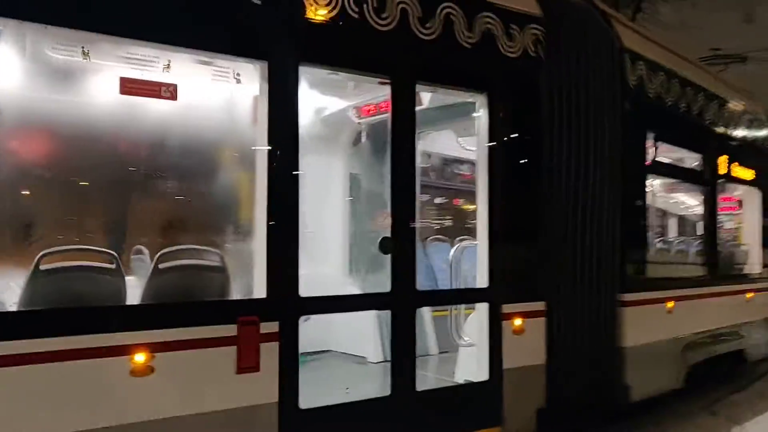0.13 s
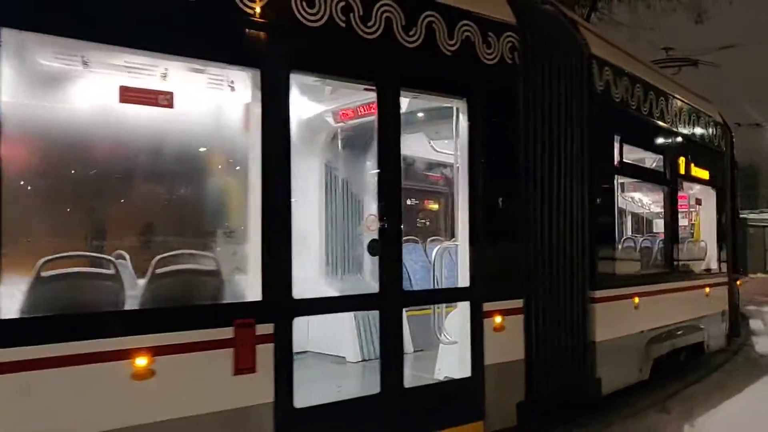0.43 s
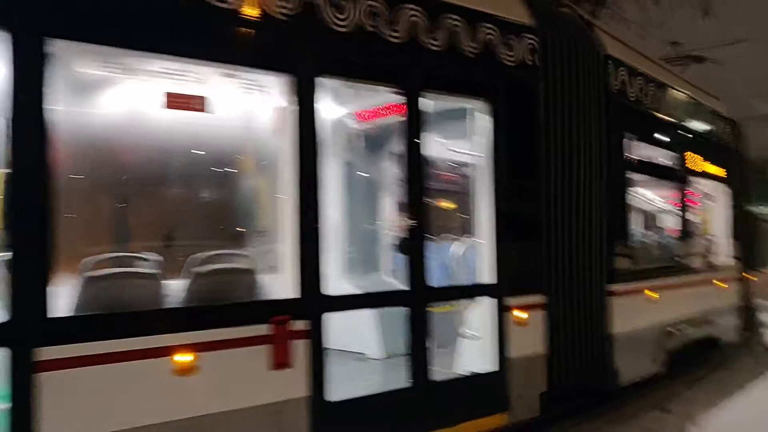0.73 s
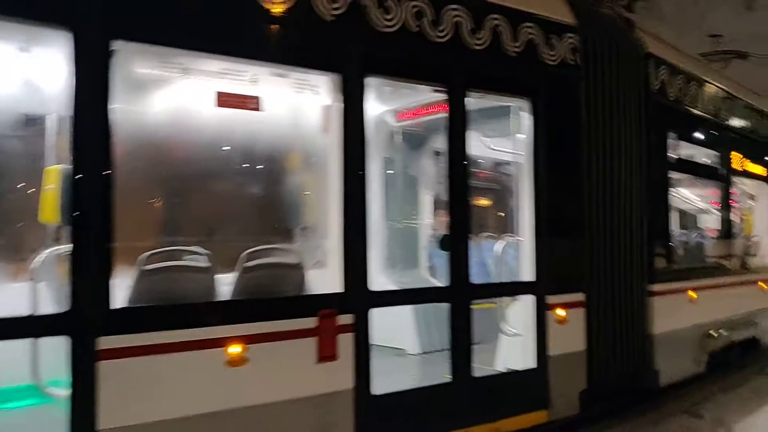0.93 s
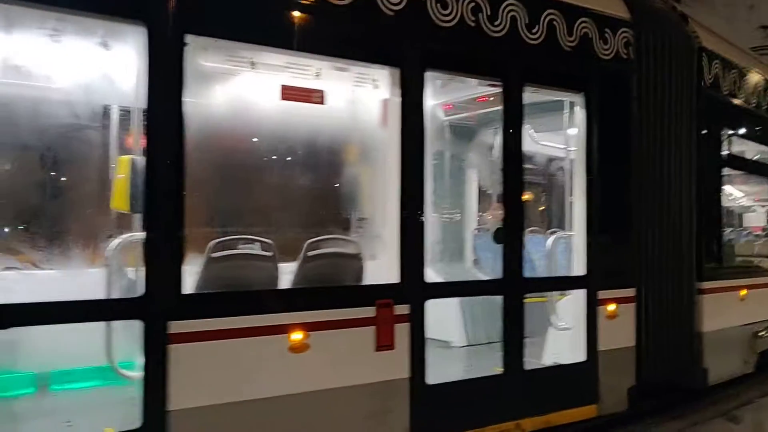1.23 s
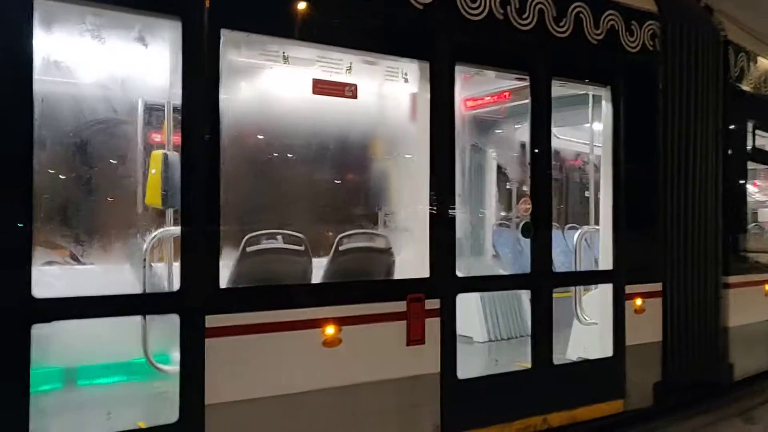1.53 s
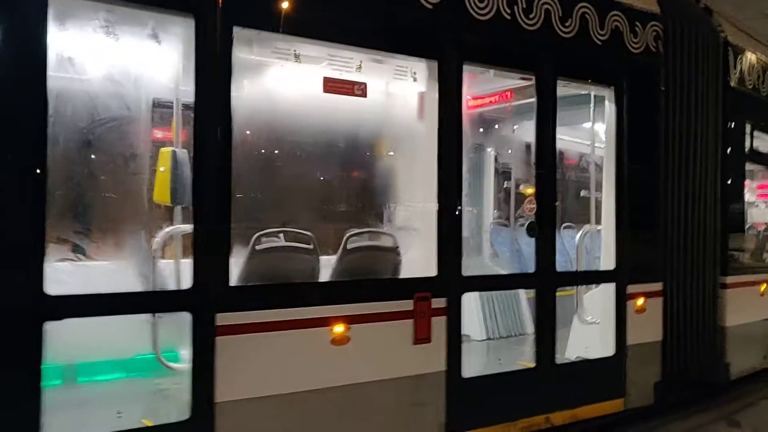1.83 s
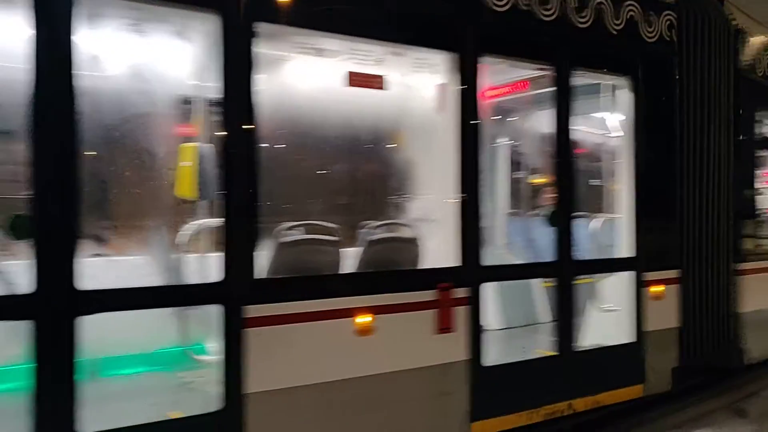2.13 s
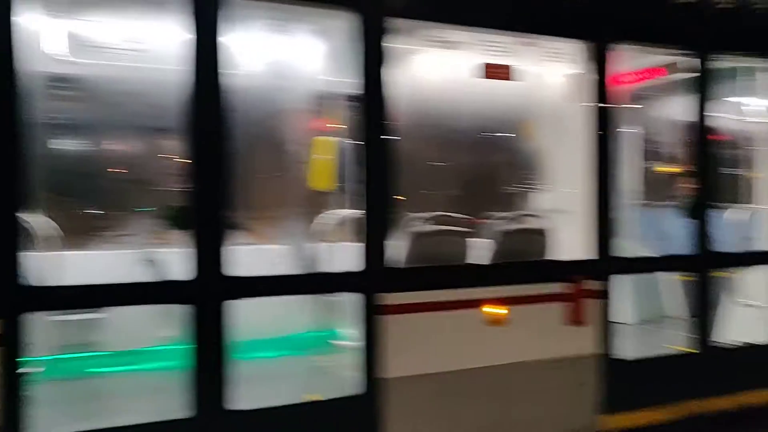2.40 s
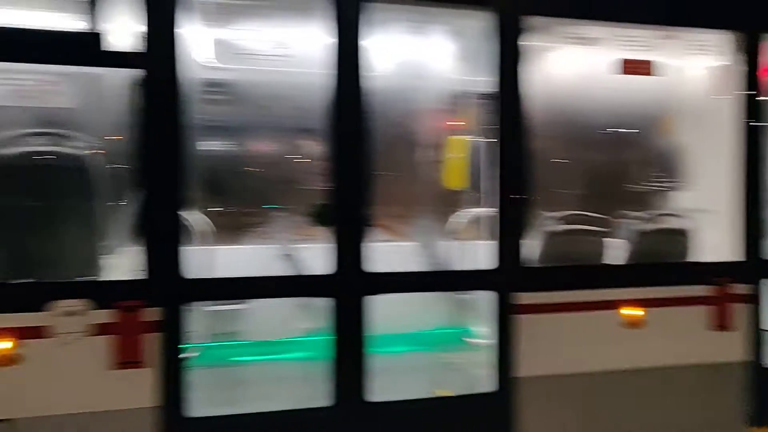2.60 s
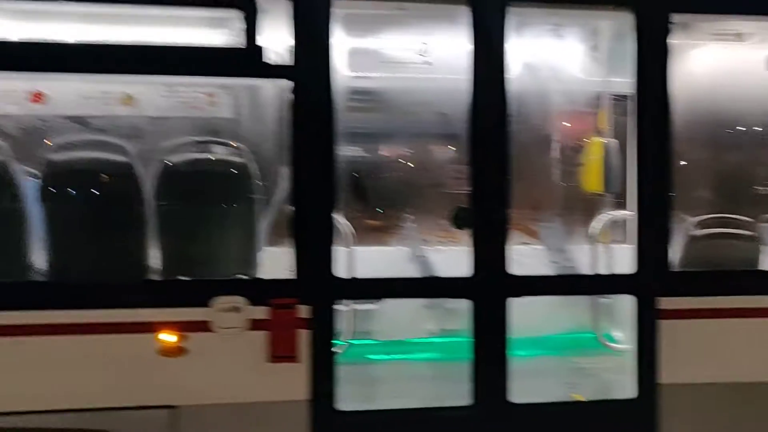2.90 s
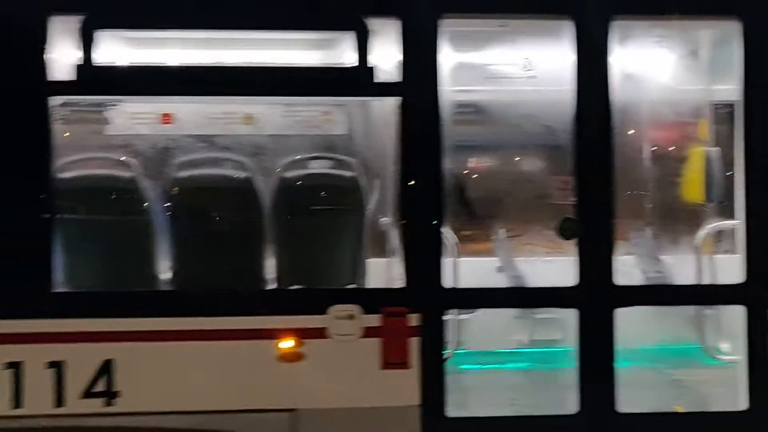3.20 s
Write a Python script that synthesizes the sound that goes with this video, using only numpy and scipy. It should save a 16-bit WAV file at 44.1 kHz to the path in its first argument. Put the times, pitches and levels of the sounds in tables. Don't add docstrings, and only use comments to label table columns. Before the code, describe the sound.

Tram rolling to a stop at night: fluttering high whine fades, deep rumble, ticks, knocks, wind gust

```python
import sys
import numpy as np
from scipy import signal
from scipy.fft import rfft, irfft, next_fast_len
from scipy.io import wavfile
from scipy.ndimage import uniform_filter1d, map_coordinates

SR = 44100
rng = np.random.default_rng(int(sys.argv[2]) if len(sys.argv) > 2 else 0)


def elevation(decibels):
    levels = np.asarray(decibels, float)
    return 10 ** (levels / 20)


def master(y):
    cut = np.clip(np.atleast_2d(y).T, -1, 1)
    pcm = np.round(cut * 32767)
    wavfile.write(sys.argv[1], SR, pcm.astype(np.int16))


N = 147735
CLOCK = np.arange(N) / SR

# t/s, electrical f/Hz, level/dB
MOTOR = [
    (0, 28, -44),
    (.3, 21.5, -45),
    (.8, 19, -47.5),
    (1.3, 12.6, -52.5),
    (1.62, 9.9, -53),
    (1.78, 9.5, -48),
    (1.93, 9.1, -57),
    (2.06, 6.8, -64),
    (2.15, 6.7, -90),
]
CARRIER_HZ = 2500.5


def unit(x):
    return x / np.sqrt(np.mean(x ** 2) + 1e-20)


def along(points, hz):
    f, value = np.transpose(points)
    return np.interp(np.log(hz + 1), np.log(f + 1), value)


def curves(rows):
    s, *cols = np.transpose(rows)
    return [np.interp(CLOCK, s, c) for c in cols]


def wobble(rate):
    knots = rng.standard_normal(int(N * 40 / SR) + 4)
    return map_coordinates(knots, [np.arange(N) * min(rate, 39) / SR])


def filtered(x, response):
    m = next_fast_len(N + SR // 2)
    return irfft(rfft(x, m) * response(np.fft.rfftfreq(m, 1 / SR)), m)[..., :N]


def resonances(body):
    def response(f):
        return sum((-1) ** k * elevation(db) * 1j * f * width / (hz * hz - f * f + 1j * f * width)
                   for k, (hz, width, db) in enumerate(body))
    return response


def swell(start_s, length_s):
    return np.sin(np.pi * np.clip((CLOCK - start_s) / length_s, 0, 1)) ** 2


def rush(gain, patchy_db):
    # f/Hz, likeness (0 to 1)
    alike = [(60, 0.67), (330, 0.98), (650, 0.12), (1400, 0.72), (2200, 0.24), (4500, 0.031), (7000, 0.026)]
    z = signal.stft(rng.standard_normal((2, N)), nperseg=512)[2]
    field = uniform_filter1d(rng.standard_normal(z.shape[1:]), size=6, axis=0)
    field = uniform_filter1d(field, size=14, axis=1)
    pair = signal.istft(z * elevation(patchy_db * unit(field)), nperseg=512)[1][:, :N]

    def mid_side_gain(hz):
        turn = np.arccos(np.clip(along(alike, hz), -1, 1)) / 2
        return gain(hz) * np.array([np.cos(turn), np.sin(turn)])
    mid, side = filtered(pair, mid_side_gain)
    return unit(np.array([mid + side, mid - side]))


def whine():
    # multiple, level/dB, right over left/dB
    carriers = [(2, -13, -1), (3, -6, -3.5), (4, -2, 8), (6, -14, -1)]
    # order (offset = order x half the carrier multiple x motor frequency), level/dB
    sidebands = [(-2, -11), (-1, -2), (-.3, -2), (1, 0), (2, -12)]
    motor_hz, level_db = curves(MOTOR)
    turn = 2 * np.pi * np.cumsum(motor_hz) / SR
    out = np.zeros((2, N))
    for multiple, db, right_db in carriers:
        for order, side_db in sidebands:
            phase = 2 * np.pi * multiple * CARRIER_HZ * CLOCK + order * multiple / 2 * turn
            tone = np.sin(phase + 0.5 * multiple * wobble(18) + rng.uniform(0, 2 * np.pi))
            fade_db = 2 * np.array([wobble(30), wobble(30)])
            lean_db = np.array([[-right_db / 2], [right_db / 2]])
            out += elevation(db + side_db + fade_db + lean_db) * tone
    return elevation(level_db - 4 + 0.8 * wobble(30)) * out


def beats():
    # t/s, peak level/dB
    swells = [(0.006, -45.5), (0.053, -42.5), (0.088, -38.5), (0.105, -39), (0.149, -41), (0.168, -42),
              (0.225, -49), (0.249, -47), (0.289, -44), (0.351, -53), (0.378, -51), (0.427, -52),
              (0.475, -44.5), (0.517, -43.5), (0.549, -44.5), (0.613, -41), (0.643, -48), (0.674, -42.5),
              (0.695, -47), (0.734, -53), (0.753, -46), (0.771, -48), (0.794, -44.5), (0.824, -48),
              (0.874, -45.5), (0.915, -41.5), (0.947, -50), (0.973, -49), (0.993, -50), (1.022, -45),
              (1.043, -55), (1.082, -47), (1.104, -52), (1.15, -44), (1.17, -45), (1.208, -41.5),
              (1.259, -50), (1.301, -39.5), (1.348, -53), (1.41, -41.5), (1.45, -49), (1.465, -52),
              (1.499, -50), (1.532, -49), (1.601, -45), (1.643, -47), (1.67, -46), (1.702, -53),
              (1.743, -53), (1.779, -48), (1.8, -48), (1.841, -49), (1.867, -56), (1.887, -55),
              (1.918, -58), (1.996, -57), (2.036, -57), (2.076, -61)]
    s, db = np.transpose(swells)
    turn = np.pi * np.interp(CLOCK, s, np.arange(len(s)))
    drift = 2 * np.pi * 0.33 * np.cumsum(curves(MOTOR)[0]) / SR
    wander = 0.25 * wobble(5.15) * np.array([[1], [-1]])
    carrier = 2 * np.pi * 2 * CARRIER_HZ * CLOCK + drift + wander
    lean = np.array([[0.39], [0.13]]) - 0.12 * CLOCK
    tone = np.cos(turn) * np.cos(carrier) - lean * np.sin(turn) * np.sin(carrier)
    return elevation(3.5 + np.interp(CLOCK, [*s, s[-1] + 0.045], [*db, -120])) * tone


def hum():
    # t/s, f/Hz, level/dB
    line = [(0.0, 54.3, -41), (0.11, 56.8, -20.5), (0.18, 58.45, -27), (0.32, 52.9, -31),
            (0.43, 58.03, -22), (0.89, 60.0, -27.5), (2.37, 60, -29), (2.48, 60.26, -21), (2.86, 59.7, -29),
            (3.08, 59.74, -18), (3.21, 61.2, -35.5), (3.35, 57.8, -17.5)]
    hz, db = curves(line)
    return np.sqrt(2) * elevation(db) * np.sin(2 * np.pi * np.cumsum(hz) / SR + 0.11 * wobble(4.97))


def panels():
    # f/Hz, width/Hz, level/dB
    drones = [(102.75, 2.7, -42.5), (159.5, 18, -49), (325.4, 9.4, -46), (258, 19, -57.5)]
    out = np.zeros((2, N))
    for hz, width, db in drones:
        ring = resonances([(hz, width, 0)])
        out += elevation(db) * rush(lambda f: np.abs(ring(f)) ** 2, patchy_db=-3)
    return out


def gears():
    # t/s, length/s, start f/Hz, level/dB
    tones = [
        (1.115, 0.36, 333, -42.5),
        (1.544, 0.332, 280.7, -38),
    ]
    sag = 90
    out = np.zeros(N)
    for s, length, hz, db in tones:
        t = CLOCK - s
        out += elevation(db + 2) * swell(s, length) * np.sin(2 * np.pi * (hz - sag * t / 2) * t)
    return out


def rumble():
    # t/s, level/dB
    roll = [
        (0, -25.5),
        (.5, -21.5),
        (1, -24),
        (1.6, -21.5),
        (2.2, -28.5),
        (2.8, -22.5),
        (3.35, -23.5),
    ]
    # f/Hz, level/dB per Hz
    deep_colour = [(15, -17.5), (25, -3.5), (50, -4.5), (75, -12), (110, -15.5), (160, -33.5), (300, -97)]
    growl_colour = [(50, -37), (90, -5.5), (150, 2.5), (200, -5.5), (280, -10), (420, -23), (800, -96)]
    roll_db, = curves(roll)
    motor_hz = curves(MOTOR)[0]
    deep = elevation(roll_db + 1.2 * wobble(4)) * rush(lambda f: elevation(along(deep_colour, f)), patchy_db=0.5)
    growl_db = -42.5 + 5.47 * motor_hz / 10 + 0.99 * wobble(9.39)
    return deep + elevation(growl_db) * rush(lambda f: elevation(along(growl_colour, f)), patchy_db=1.5)


def knocks():
    # t/s, level/dB, softness f/Hz
    blows = [
        (2.5401, -19, 1200),
        (2.6333, -25, 800),
        (2.719, -16.5, 1250),
    ]
    # f/Hz, width/Hz, level/dB
    body = [(265, 156, -2), (484, 230, -3.5), (990, 830, -8.5)]

    def response(f):
        struck = sum(elevation(db + 36.5) * np.exp(-2j * np.pi * f * s) / (1 + 1j * f / hz - (f / hz) ** 2) ** 3
                     for s, db, hz in blows)
        return resonances(body)(f) * struck
    return filtered((np.arange(N) == 0).astype(float), response)


def ticks():
    # t/s, peak level/dB, brightness/dB
    cracks = [(0.019, -44, 3), (0.146, -42, -13), (.159, -50, -12), (0.6867, -42, 4), (.699, -44, -8),
              (1.113, -53, 10), (1.242, -50, -7), (1.4157, -47.5, -8), (1.6, -43.5, -13), (1.641, -47, -12),
              (1.6703, -42, -10), (1.682, -45, -13), (1.7227, -34.5, -5), (2.0466, -33.5, -14),
              (2.08, -51, -11), (3.1386, -49, -9)]
    t60_s, right_db = 0.0076, 4
    t = np.arange(SR // 20) / SR
    dry_ticks = np.zeros((2, N + SR))
    for s, db, bright_db in cracks:
        crack = elevation(db + 18.5 - 60 * t / t60_s) * rng.standard_normal(len(t))
        dry_ticks[:, round(s * SR):][:, :len(t)] += crack * elevation(np.array([[0], [bright_db]]))
    middle, bright = resonances([(8430, 2200, 0)]), resonances([(14300, 3500, 0)])
    ringing = filtered(dry_ticks[:, :N], lambda f: np.array([middle(f), bright(f)]) ** 2)
    return ringing.sum(axis=0) * elevation(np.array([[-right_db], [right_db]]))


def puffs():
    # t/s, length/s, f/Hz, width/Hz, level/dB
    jets = [
        (.09, .11, 8200, 1800, -48),
        (.19, .1, 5600, 2200, -46),
        (.22, .08, 3800, 1500, -52),
        (1.4, .12, 6500, 3000, -53),
        (1.6, .13, 7800, 2600, -49),
        (1.77, .12, 4000, 2000, -54),
        (2.7, .07, 5800, 2200, -52),
        (2.82, .04, 5600, 1500, -54),
    ]
    out = np.zeros((2, N))
    for s, length, hz, width, db in jets:
        ring = resonances([(hz, width, 0)])
        air = filtered(rng.standard_normal((2, N)), lambda f: ring(f) ** 2)
        out += elevation(db) * swell(s, length) * unit(air)
    return out


def squeaks():
    # t/s, length/s, start f/Hz, glide/(Hz per s), level/dB
    glides = [
        (.235, .06, 5000, -16000, -48),
        (1.79, .045, 2350, 6000, -47),
        (1.79, .07, 4400, -9000, -58),
    ]
    slips = 1.1 * np.sin(2 * np.pi * 70 * CLOCK)
    out = np.zeros(N)
    for s, length, hz, glide, db in glides:
        t = CLOCK - s
        out += elevation(db) * swell(s, length) * np.sin(2 * np.pi * (hz + glide * t / 2) * t + slips)
    return out


def wind():
    # t/s, level/dB
    gust = [
        (0, -46),
        (1, -56),
        (2, -66),
        (3.09, -67),
        (3.17, -25),
        (3.22, -24),
        (3.28, -27),
        (3.35, -18),
    ]
    # f/Hz, level/dB per Hz
    buffet = [(15, -34), (40, -7), (100, 9), (170, 16), (260, -10.5), (400, -13), (800, -55), (2000, -100)]
    # t/s, peak level/dB, f/Hz
    eddies = [
        (3.179, -15, 150),
        (3.202, -9, 150),
        (3.279, -11, 160),
        (3.292, -12.5, 120),
        (3.308, -3.5, 190),
        (3.339, -15, 200),
    ]
    gust_db, = curves(gust)
    noise = filtered(rng.standard_normal((2, N)), lambda f: elevation(along(buffet, f)))
    lumps = elevation(2.5 * np.array([wobble(29.79), wobble(23)]))
    snaps = np.zeros(N)
    for way, (s, db, hz) in zip([1, 1, 1, 1, -1, 1], eddies):
        t = CLOCK - s
        snaps += way * elevation(db) * np.sin(2 * np.pi * hz * t) * np.exp(-(2.12 * hz * t) ** 2)
    port_db = np.array([[0], [-25]])
    return elevation(port_db) * (elevation(gust_db) * unit(lumps * noise) + snaps)


def fans():
    # t/s, level/dB
    air = [
        (0, -44.5),
        (.5, -46.5),
        (1.18, -46.5),
        (1.7, -46.5),
        (2.13, -47),
        (2.5, -48),
        (2.8, -46.5),
        (3.35, -47.5),
    ]
    # f/Hz, level/dB per Hz
    colour = [(100, -7.5), (250, 6), (450, 2.5), (1000, 3), (1700, -7.5), (3000, -18), (14000, -15),
              (15200, -31)]
    air_db, = curves(air)
    level_db = -37 + air_db - air_db.mean() + 0.37 * wobble(7.63)
    return elevation(level_db) * rush(lambda f: elevation(along(colour, f)), patchy_db=0.66)


def dropouts(x):
    # f/Hz, share of frames (0 to 1)
    shares = [(2000, 0), (3000, .05), (4500, .04), (6000, .01), (7100, .04), (8700, .01), (9500, .35),
              (14000, .25)]
    hz, t, z = signal.stft(x, SR, window="cosine", nperseg=2048)
    band = np.arange(len(hz)) // 12
    from_tone_hz = np.abs((hz + CARRIER_HZ / 2) % CARRIER_HZ - CARRIER_HZ / 2)
    chance = along(shares, hz) * (from_tone_hz >= 140)
    muted = rng.random((band[-1] + 1, len(t)))[band] < chance[:, None]
    return signal.istft(z * elevation(-25 * muted), SR, window="cosine", nperseg=2048)[1][:, :N]


def scene():
    brakes = knocks() + ticks() + puffs() + squeaks()
    tram = whine() + beats() + hum() + panels() + gears() + rumble() + brakes + fans()
    lag_s, from_hz = 0.00059, 488

    def port_delays(f):
        lag = np.pi * lag_s * (f - from_hz * (1 - np.exp(-f / from_hz)))
        return np.exp(1j * np.array([lag, -lag]))
    return filtered(tram, port_delays) + wind()


def band_limit(x):
    return signal.sosfilt(signal.butter(12, 15400, fs=SR, output="sos"), x)


def record(dry):
    # f/Hz, level/dB
    left_port = [(1000, -2.5), (2000, -0.5), (4500, 2), (6100, 5.5), (7300, -5.5), (8500, -28),
                 (10000, -25.5), (12500, -19)]
    right_port = [(1000, -1.5), (2000, 4), (4500, 3.5), (6000, -0.5), (8200, -1), (9400, -8.5),
                  (10700, -28.5), (12200, -16.5)]

    def port_colour(f):
        return elevation(np.array([along(left_port, f), along(right_port, f)])) * (f < 15400)
    return band_limit(dropouts(filtered(dry, port_colour)))


dry = scene()
out = record(dry)
master(out)
```